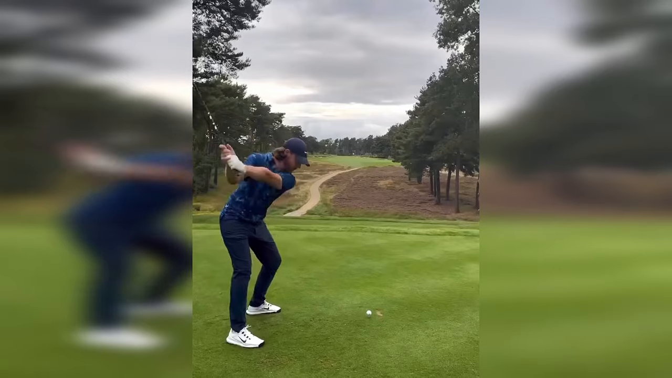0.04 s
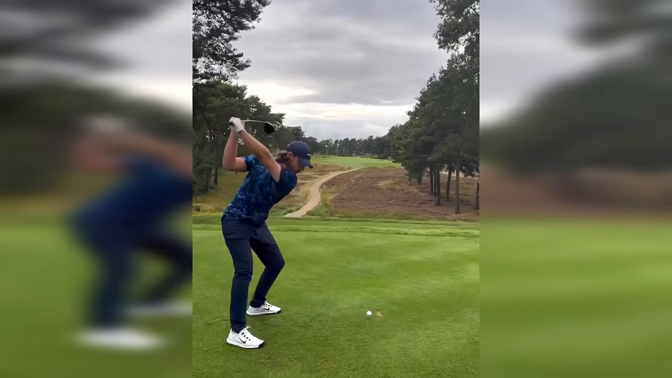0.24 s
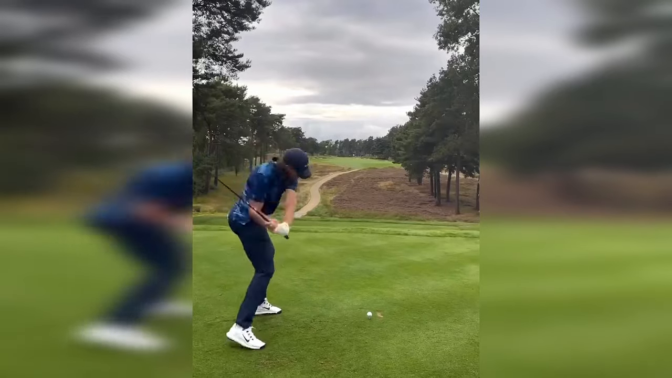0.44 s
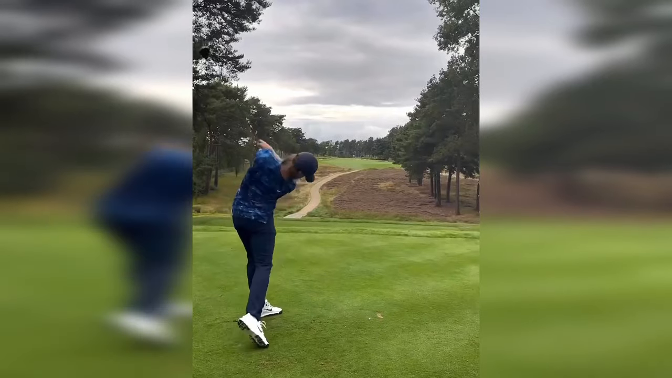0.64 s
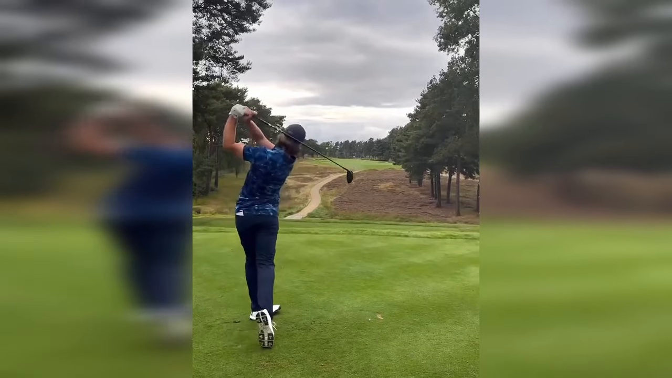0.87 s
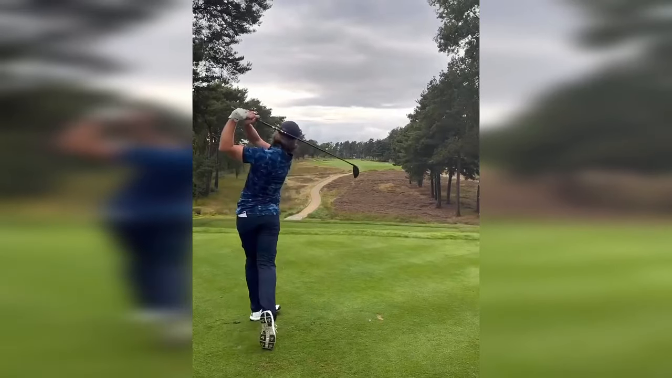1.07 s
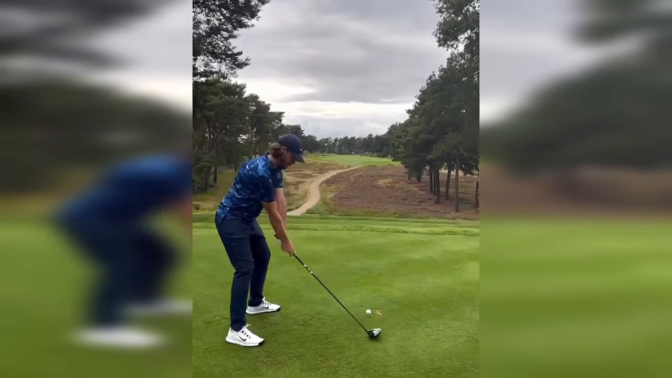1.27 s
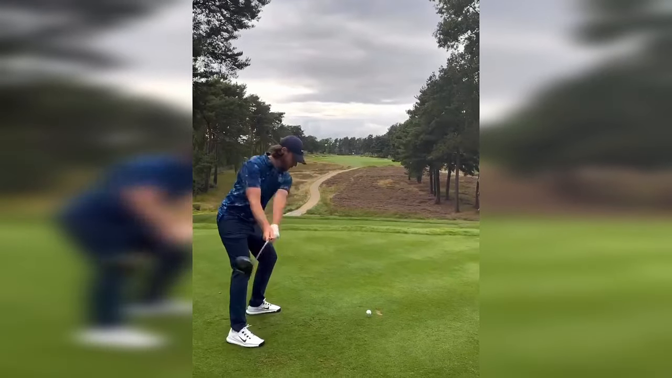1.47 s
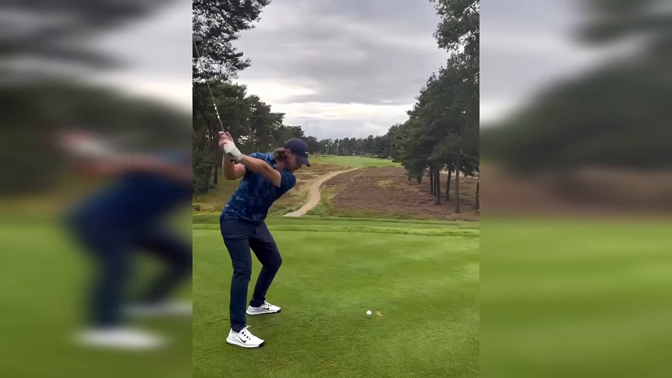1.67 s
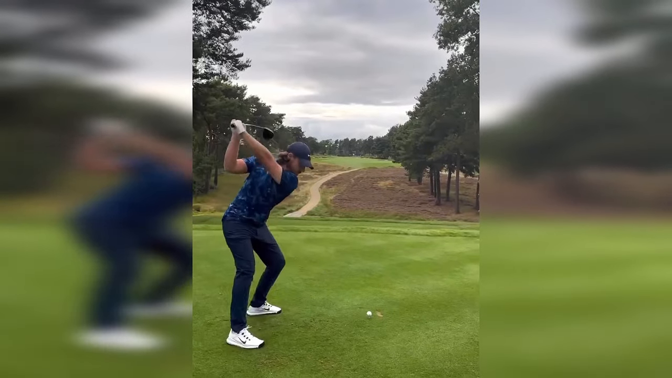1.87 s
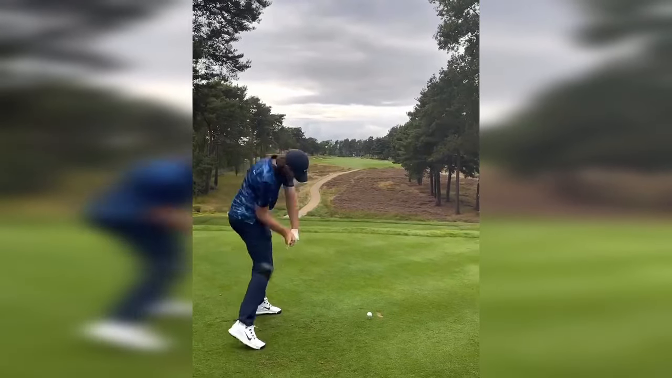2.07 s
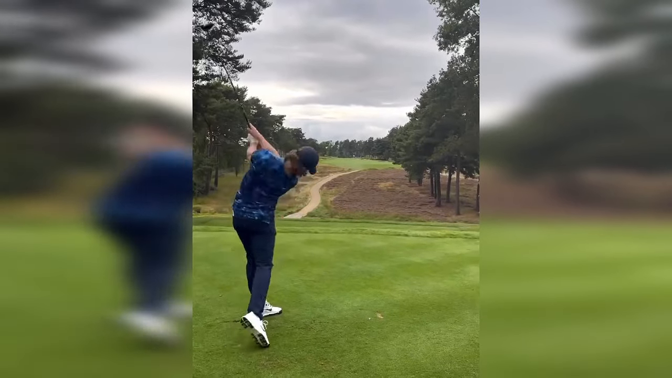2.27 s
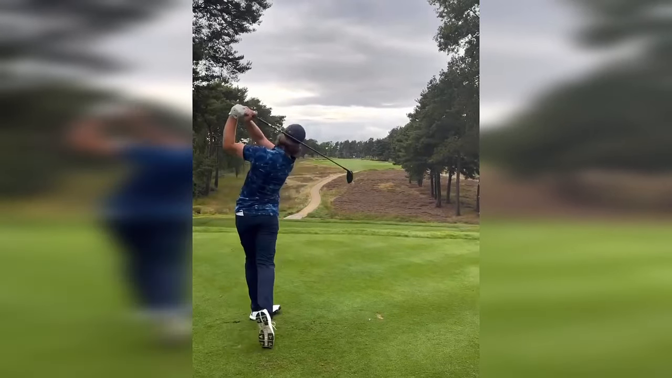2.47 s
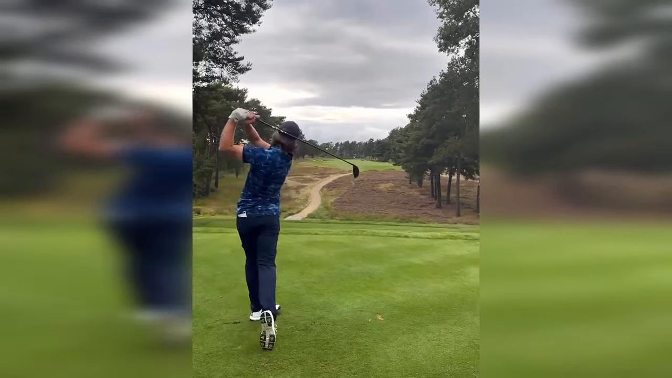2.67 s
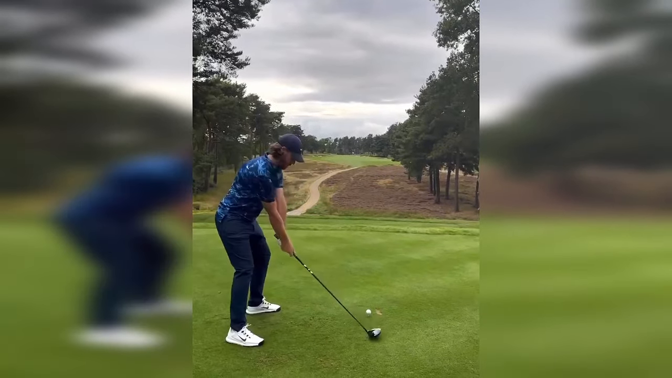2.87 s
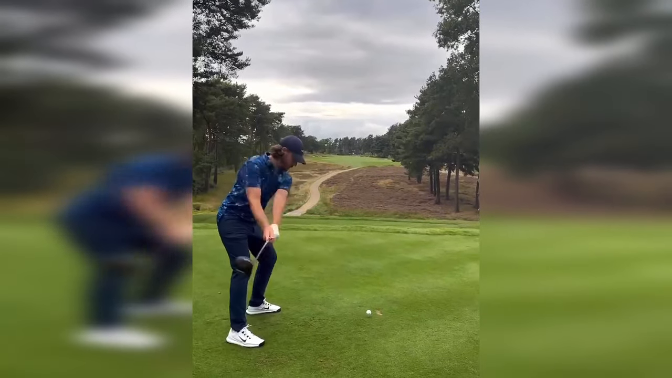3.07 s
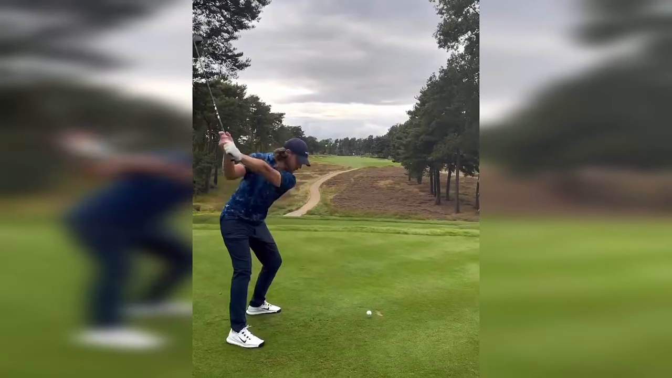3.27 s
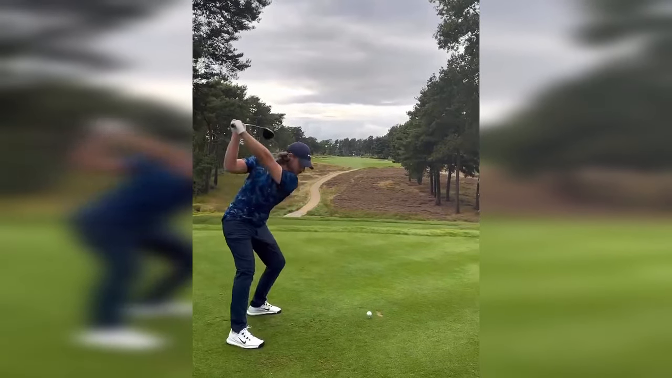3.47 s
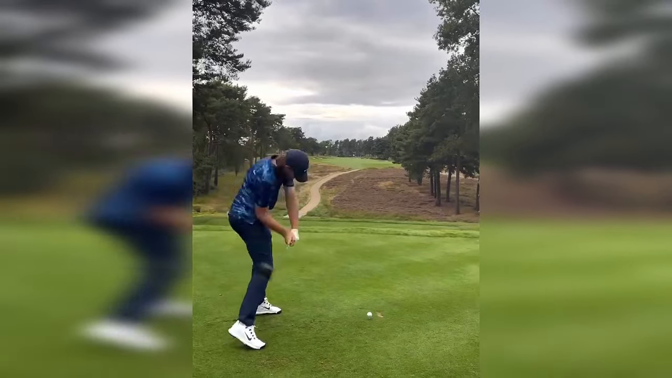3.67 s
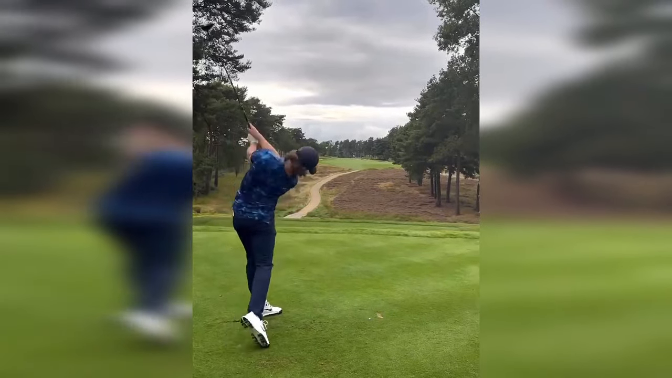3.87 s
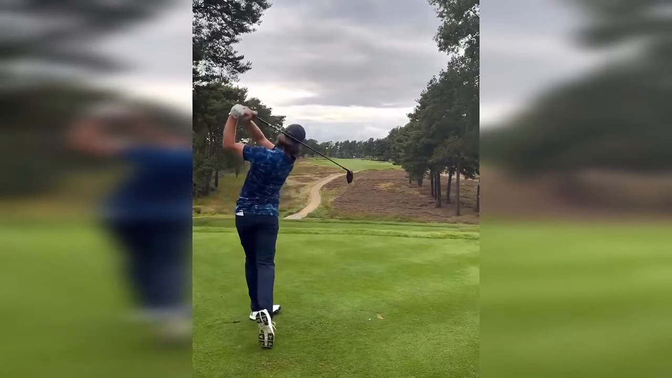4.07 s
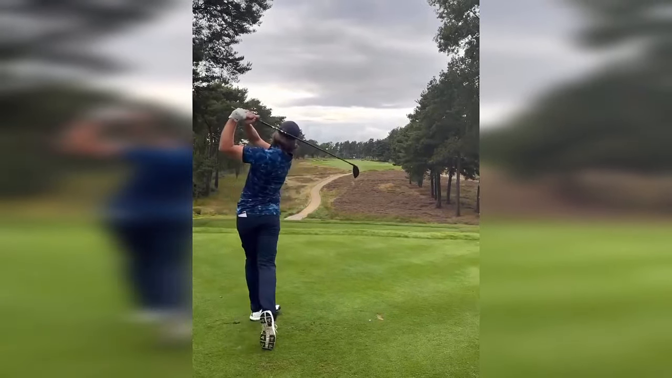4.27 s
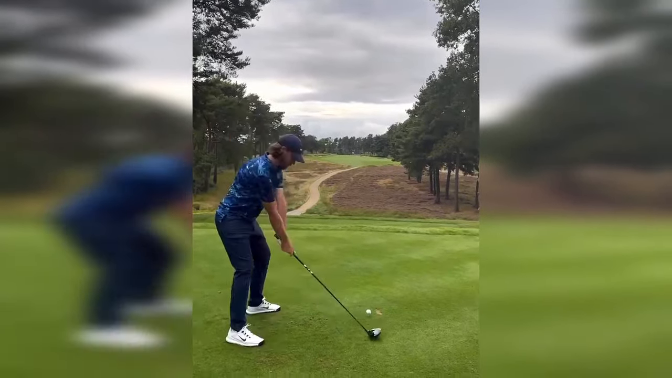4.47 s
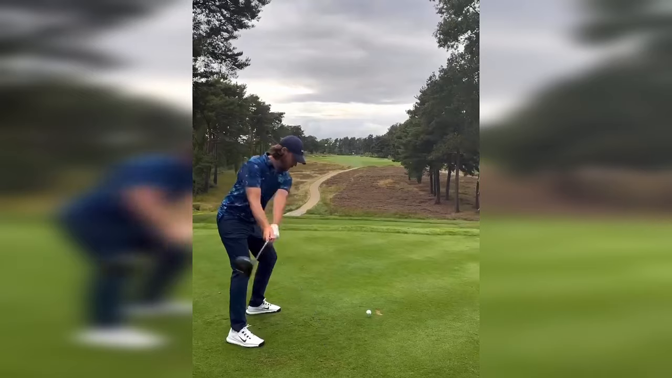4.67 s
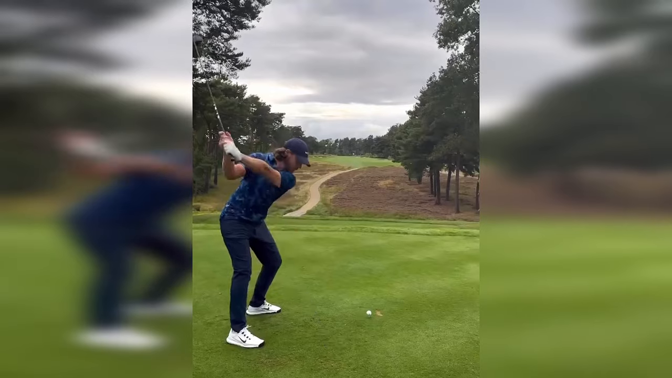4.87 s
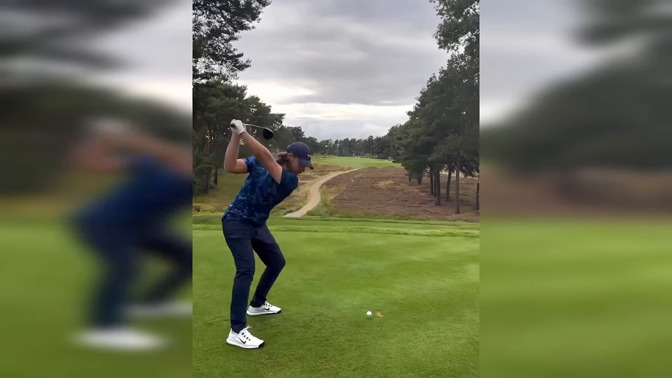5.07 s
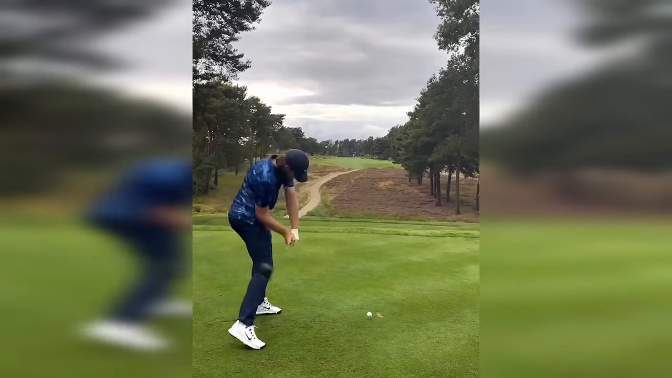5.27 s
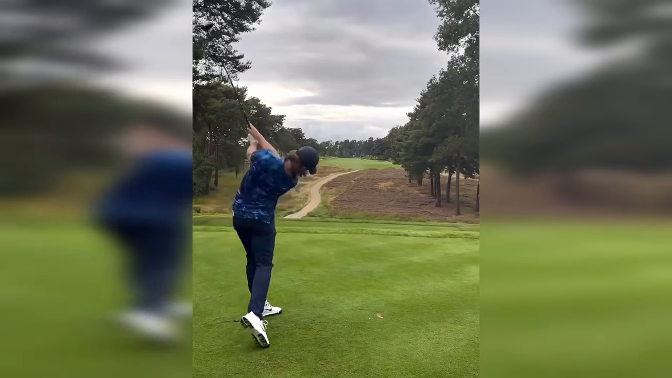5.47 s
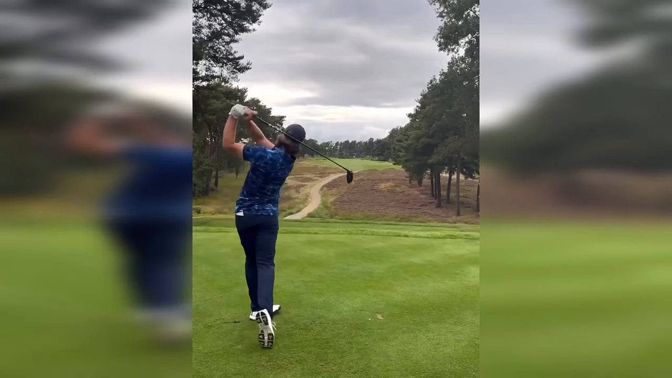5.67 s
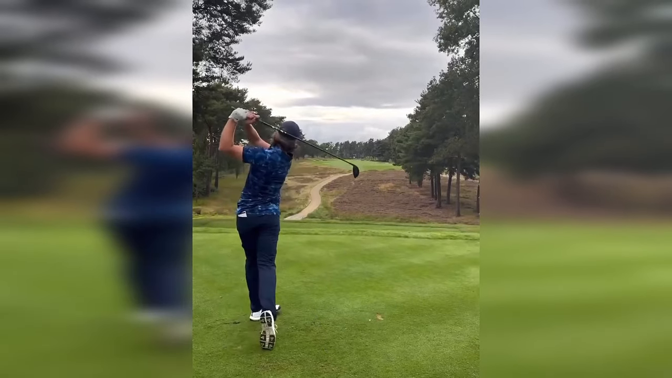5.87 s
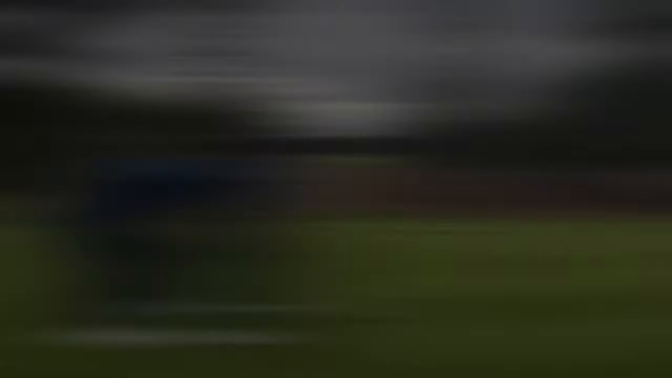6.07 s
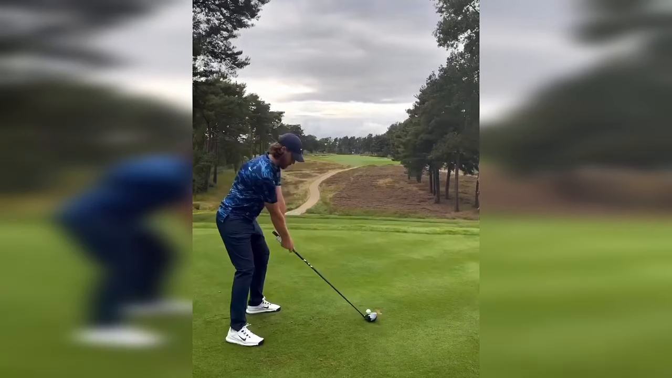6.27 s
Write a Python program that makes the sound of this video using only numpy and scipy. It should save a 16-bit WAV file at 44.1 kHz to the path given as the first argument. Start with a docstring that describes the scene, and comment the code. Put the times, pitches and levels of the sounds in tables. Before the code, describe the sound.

On an open tee between pine woods, distant machinery throbs low beneath a soft far roar. A club rushes through the air and hits the ball with a very loud, bright, dry metallic crack, followed by a brief scattered echo from the trees. The background dips after the blow, then recovers. The same drive repeats four times, 1.6 seconds apart, and cuts to silence. Close stereo microphone.

```python
"""Distant machinery rumbles, then a golf drive cracks off an open tee between pine woods, over and over.
The bass and roar are coloured noise with wavering tones; the swish is a sliding vortex tone in torn air.
The crack is a sum of ringing club head modes, and tee, turf and tree lines return it as decaying noise.
Two spaced microphone ports hear it all; gain control ducks the sound after the blow.
The stretch around the single drive repeats as a short loop until it stops."""
import sys
import numpy as np
from scipy import signal
from scipy.fft import rfft, irfft, next_fast_len
from scipy.io import wavfile

SR = 44100
rng = np.random.default_rng(int(sys.argv[2]) if len(sys.argv) > 2 else 0)


def master_out(mix):
    """Clip the mix to full scale and print it as 16-bit PCM to the path in sys.argv[1]."""
    frames = np.transpose(np.atleast_2d(mix))
    ceiling = np.clip(frames, -1, 1)
    pcm = np.round(ceiling * 32767).astype(np.int16)
    wavfile.write(sys.argv[1], SR, pcm)


N = 279064
TIME = np.arange(N) / SR   # [s]
STRIKE_S = 3.70810   # the blow, on the clock of the single drive


def crack():
    """The brief squash of the ball rings the hollow head; each path to the ports repeats the ring."""
    # ringing modes of the club head: (frequency [Hz], left level [dB], right level [dB], 60 dB decay [s])
    head_modes = [(330, -22, -24, .012), (575, -20, -21, .010), (990, -6, -14, 0.009),
                  (1870, -7, -10, 0.009), (2400, -15, -16, .008), (3600, -25, -24, .010),
                  (4150, -23, -21, 0.008), (4860, -18, -12, 0.013), (5350, -14, -8, 0.005),
                  (5760, -6, -3, 0.015), (6270, -20, -18, 0.012), (6830, -17, -17, .014),
                  (7700, -16, -18, 0.011), (8590, -16, -19, 0.009), (10500, -13, -13, 0.002),
                  (13050, -4, -5, 0.0035), (14500, -9, -10, 0.003)]
    # direct, off the turf, then off the player and bag: (left delay [s], right delay [s], level [dB])
    paths = [(.0003, .0001, 0), (.00100, .00112, -9.5), (.0021, .0021, -16), (.0037, .0031, -15),
             (.0072, .0072, -22)]
    contact_s = .0007
    # the low modes come from the left: the right port hears them late
    thud_below_hz, thud_lag_s = 3000, .00016
    t = np.arange(int(.08 * SR)) / SR
    out = np.zeros((2, N))
    for side in range(2):
        for path in paths:
            for mode in head_modes:
                hz, level_db, decay_s = mode[0], mode[1 + side] + path[2], mode[3]
                delay_s = path[0] + side * thud_lag_s if hz < thud_below_hz else path[side]
                since = np.maximum(t - delay_s, 0)
                swell = 1 - np.exp(-(since / contact_s) ** 2)   # force builds while the ball flattens
                # the cosines of all modes crest together as the ball lets go
                ring = np.cos(2 * np.pi * hz * (since - contact_s)) * amp(-60 * since / decay_s)
                out[side, :len(t)] += amp(level_db) * swell * ring
    return np.roll(out, round(STRIKE_S * SR), axis=1)


def swish():
    """The shaft sheds vortices: a rough sliding tone in a rush and hiss of torn air."""
    # downswing: (time [s], low rush level [dB], hiss level [dB])
    swing_levels = [(3.56, -67, -81), (3.6, -50.5, -66.5), (3.615, -42.5, -59.5), (3.64, -54, -58),
                    (3.658, -38.5, -45.5), (3.664, -34.5, -46), (3.69, -30.5, -43.5), (3.706, -32.5, -31),
                    (3.716, -42, -54), (3.74, -51, -65.5), (3.76, -69, -75.5), (3.8, -87, -92)]
    # colour of the low rush: (frequency [Hz], relative level per Hz [dB])
    rush_colour = [(90, -26.5), (170, -3.5), (300, 0.5), (450, -1), (600, 7), (800, 0), (1100, 6),
                   (1500, -2.5), (2000, -8.5), (2700, -11.5), (3500, -17), (4500, -26.5)]
    # colour of the hiss: (frequency [Hz], relative level per Hz [dB])
    hiss_colour = [(1500, -10), (3000, -8.5), (4500, -1.5), (6000, 4), (8000, -2.5), (11000, -11.5),
                   (15100, -11), (15600, -34.5)]
    # the tone holds until shortly before the blow and slides down meanwhile
    hold_from_s, hold_until_s, hold_db = 3.666, 3.690, -29
    rise_db_per_s, fall_db_per_s = 2500, 900
    start_hz, sag_hz_per_s = 864.6, 8900
    rush_db, hiss_db = in_time(swing_levels)

    tone_db = hold_db + peaked(TIME, hold_from_s, hold_until_s, rise_db_per_s, fall_db_per_s)
    tone_hz = start_hz - sag_hz_per_s * (np.clip(TIME, hold_from_s, hold_until_s) - hold_from_s)
    turn = 2 * np.pi * np.cumsum(tone_hz) / SR
    # slow noise roughens both the strength and the phase
    slow = signal.butter(2, 90.0, fs=SR, output="sos")
    wobble = signal.sosfilt(slow, rng.standard_normal((2, N)))
    in_phase = (2.1 + rms_one(wobble[0])) * np.cos(turn)
    tone = rms_one(in_phase + rms_one(wobble[1]) * np.sin(turn))

    rush, hiss = noise(rush_colour, channels=3), noise(hiss_colour)
    aimed_tone = ports(amp(tone_db) * tone, lag=16, pan_db=7)
    aimed_rush = ports(amp(rush_db) * rush[0], lag=22, pan_db=4.5)
    rush_around = amp(rush_db - 3) * rush[1:]   # the rush also comes from all around
    wide_hiss = amp(hiss_db) * hiss * amp([[-.7], [.7]])   # a little stronger on the right
    return aimed_tone + aimed_rush + rush_around + wide_hiss


def scattered_returns():
    """Tee, turf and countless trunks scatter the crack back as a dense wash that dulls with distance."""
    # tee and turf: (time after the blow [s], level [dB], rise [dB/s], fall [dB/s])
    near_scatterers = [(0.004, -27, 3000, 1200), (.013, -39, 1500, 1200), (.023, -40, 1500, 500),
                       (.034, -42, 400, 3000)]
    # tree lines, then far woods: (time after the blow [s], level [dB], rise [dB/s], fall [dB/s])
    far_scatterers = [(0.117, -43, 195, 156), (.2, -58, 60, 27)]
    # close returns keep the head's ring: (frequency [Hz], relative level per Hz [dB])
    near_colour = [(400, -10.5), (1000, -10), (1500, -16), (2700, -16), (3150, -24), (4000, -14),
                   (5000, -2.5), (5500, -8), (6000, -4), (7200, -8), (8400, -4), (10100, -11.5),
                   (11600, -15), (15000, -12), (15700, -40.5)]
    # colour of the woods' returns: (frequency [Hz], relative level per Hz [dB])
    far_colour = [(500, -23), (1500, -10.5), (3000, -6.5), (4500, -10.5), (6000, -3), (7100, -3),
                  (7800, -6.5), (9000, -8.5), (12000, -11), (15000, -13.5), (16000, -37)]
    # longer paths lose their treble: (above this frequency [Hz], further loss [dB/s])
    air_loss = [(7300, 29.5), (10000, 34)]
    since, wash = TIME - STRIKE_S, 0
    for table, spectrum in ((near_scatterers, near_colour), (far_scatterers, far_colour)):
        power = 0
        for s, db, rise_db, fall_db in table:
            power = power + amp(db + peaked(since, s, s, rise_db, fall_db)) ** 2
        wash = wash + np.sqrt(power) * far_off(spectrum)
    for split_hz, loss_db in air_loss:
        treble_gain = amp(-loss_db * np.maximum(since, 0))
        wash = wash + (treble_gain - 1) * above(split_hz, wash)
    clumps = rms_one(resonance(rng.standard_normal((2, N)), 46, 90))   # trunks stand unevenly
    return (since > 0) * amp(2.0 * clumps) * wash


def rustles():
    """Short faint puffs of band noise, heard at address."""
    # bright puffs: (start [s], length [s], low edge [Hz], high edge [Hz], level [dB])
    puffs = [(2.747, 0.064, 10200, 15600, -81), (2.769, 0.0094, 3000, 15000, -70),
             (2.782, 0.13, 7650, 8600, -75)]
    out = np.zeros((2, N))
    for s, length, low_hz, high_hz, db in puffs:
        shape = np.sin(np.pi * np.clip((TIME - s) / length, 0, 1)) ** 0.86
        band = signal.butter(2, [low_hz, high_hz], "band", fs=SR, output="sos")
        puff = rms_one(signal.sosfilt(band, rng.standard_normal((2, N))))
        out += amp(db) * shape * puff
    return out


def rumble():
    """Distant machinery: throbbing bass noise with wavering drones, and a far broadband roar."""
    # level course, with the further ducking after the blow:
    # (time [s], bass gain [dB], far roar gain [dB])
    rumble_levels = [(2.69, -4.5, -2), (2.72, -6, -2), (2.76, -6, 1), (2.9, -3, 1), (3.0, -3, 0.5),
                     (3.27, -2.5, 1.5), (3.55, -1.5, 2.1), (3.65, -2.5, 4), (3.70, -1, 0),
                     (3.716, -11, 0.5), (3.745, -9, -6.5), (3.79, -12, -8.5), (3.84, -11, -6),
                     (4.0, -12, -7), (4.29, -8.5, -1.5)]
    # the bass swells briefly: (time [s], rise [dB])
    swells = [(2.807, 6), (2.876, 5), (3.007, 0.5), (3.434, 4.5), (3.56, 1.5)]
    # bass colour: (frequency [Hz], relative level per Hz [dB]); bass level before its level course [dB]
    bass_colour, bass_db = [(12, -51), (20, -28.5), (60, 2), (114, -4.5), (132, -6), (166, -17),
                            (203, -5.5), (325, -20), (392, -22.5), (500, -22.5), (650, -42.5), (1100, -120)], -38
    # bass drones: (frequency [Hz], width [Hz], level before the level course [dB])
    drones = [(72, 100, -49), (71, 5.2, -42), (121, 17, -42), (199.9, 4.8, -49.5), (396.6, 3.8, -60)]
    # colour of the far roar: (frequency [Hz], relative level per Hz [dB])
    roar_colour = [(150, -41), (300, -2.5), (550, -4.5), (1000, -2), (1300, -6.5), (1600, -10), (2400, -10),
                   (3200, -8.5), (3900, -16), (4600, -27), (6200, -26.5), (7000, -34.5), (7500, -41.5),
                   (8600, -43.5), (9600, -67), (12000, -66.5), (15300, -71)]
    # faint narrow tones in the roar: (frequency [Hz], width [Hz], level against the roar noise [dB])
    whines = [(980, 6, -12), (1250, 6, -18)]
    swell_s, roar_db = 0.016, -49.5   # the roar level is before its level course
    bass_course_db, roar_course_db = in_time(rumble_levels)
    for s, rise_db in swells:
        bass_course_db = bass_course_db + rise_db * np.exp(-((TIME - s) / swell_s) ** 2)
    bass = amp(bass_db) * noise(bass_colour, channels=1)[0] + wavering(drones)
    roar = far_off(roar_colour, wavering(whines))
    return amp(bass_course_db) * ports(bass, lag=4, pan_db=0.89) + amp(roar_db + roar_course_db) * roar


def far_off(spectrum, tones=0):
    """Distant noise: part arrives from one side, part from all around."""
    # spread of distant sound: (frequency [Hz], level from all around against the one-sided part [dB])
    spread = [(150, -22.5), (300, -14.5), (600, 10), (1200, 1), (1800, -5), (2200, -20.5), (3000, -18.5),
              (3300, -9), (3800, -1.5), (4800, 3.5), (15300, 6.5)]
    size = next_fast_len(N)
    wash = noise(spectrum, channels=3)
    ratio = colour(spread) ** 2   # power from all around over one-sided power
    aimed = irfft(rfft(wash[0], size) / np.sqrt(1 + ratio), size)[:N]
    around = irfft(rfft(wash[1:], size) * np.sqrt(ratio / (1 + ratio)), size)[:, :N]
    return ports(aimed + tones, lag=8, pan_db=0.57) + around


def ports(mono, lag, pan_db):
    """One source at both ports: the right hears it lag samples late, the left pan_db stronger."""
    late = np.interp(np.arange(N) - lag, np.arange(N), mono)
    return np.array([mono * amp(pan_db / 2), late * amp(-pan_db / 2)])


def wavering(tones):
    """Noise twice through each narrow peak makes a tone that wavers in strength."""
    out = 0
    for hz, width_hz, db in tones:
        once = resonance(rng.standard_normal(N), hz, width_hz)
        out = out + amp(db) * rms_one(resonance(once, hz, width_hz))
    return out


def resonance(x, hz, width_hz):
    """Two-pole peak: a damped oscillator driven by x."""
    r = np.exp(-np.pi * width_hz / SR)
    return signal.lfilter([1, 0, -1], [1, -2 * r * np.cos(2 * np.pi * hz / SR), r * r], x)


def noise(spectrum, channels=2):
    """Unrelated noises with the given colour, at rms 1 over all channels."""
    size = next_fast_len(N)
    white = rng.standard_normal((channels, size))
    return rms_one(irfft(rfft(white) * colour(spectrum), size)[:, :N])


def colour(spectrum):
    """Gain per frequency bin, in dB along log frequency, -120 dB beyond the ends."""
    size = next_fast_len(N)
    hz, db = np.transpose(spectrum)
    bins = np.log(np.maximum(np.arange(size // 2 + 1) * SR / size, 1))
    return amp(np.interp(bins, np.log(hz), db, left=-120, right=-120))


def above(hz, x):
    """The part of x above hz, without phase shift."""
    return signal.sosfiltfilt(signal.butter(2, hz, "high", fs=SR, output="sos"), x)


def peaked(t, first, last, rise_db, fall_db):
    """Envelope in dB: climbs to 0 at first, holds to last, then falls (slopes in dB/s)."""
    return -rise_db * np.maximum(first - t, 0) - fall_db * np.maximum(t - last, 0)


def in_time(rows):
    """Columns of a curve table, sample by sample."""
    s, *columns = np.transpose(rows)
    return [np.interp(TIME, s, c) for c in columns]


def amp(db):
    """Gain from dB."""
    return 10 ** (np.asarray(db) / 20)


def rms_one(x):
    """Scale to unit rms."""
    return x / np.sqrt(np.mean(x ** 2) + 1e-20)


def scene():
    """All sources of the single drive at the two ports."""
    return crack() + swish() + scattered_returns() + rustles() + rumble()


def gain_control(x):
    """Gain falls with the excess over the threshold and creeps back, less so in the upper band."""
    threshold_db, duck_share = -3, 0.26   # dB of ducking per dB of excess
    attack_s, release_db_per_s = .008, 3   # the release is that of the held level
    treble_from_hz, treble_duck_share = 1800, .45   # the upper band takes this part of the dB
    level_db = 20 * np.log10(np.abs(x).max(axis=0) + 1e-9)
    release_db = release_db_per_s * TIME
    held_db = np.maximum.accumulate(level_db + release_db) - release_db
    r = np.exp(-1 / (attack_s * SR))
    excess_db = np.maximum(held_db - threshold_db, 0)
    duck_db = signal.lfilter([1 - r], [1, -r], duck_share * excess_db)
    treble = above(treble_from_hz, x)
    return (x - treble) * amp(-duck_db) + treble * amp(-treble_duck_share * duck_db)


def looped(x):
    """The stretch around the drive is laid end to end with short cross-fades, then stops."""
    # the plays in turn: shift of each against the single drive [samples]
    repeat_shifts = [-141160, -70560, 0, 70560, 141120]
    loop_start_s, loop_end_s, stop_s, stop_fade_s = 2.69, 4.29, 5.976, 0.025
    splice = 1100   # cross-fade where two plays meet [samples]
    first, last = round(loop_start_s * SR), round(loop_end_s * SR)
    out = np.zeros_like(x)
    for shift in repeat_shifts:
        at = np.arange(max(first + shift - splice, 0), min(last + shift + splice, N))
        fade_in = np.clip((at - shift - first) / splice + 1, 0, 1)
        out[:, at] = (1 - fade_in) * out[:, at] + fade_in * x[:, at - shift]
    return out * np.clip((stop_s - TIME) / stop_fade_s + .5, 0, 1)


def record(dry):
    """Gain control, the loop, limiting at full scale, and a steep top cut at 16.7 kHz."""
    top_cut = signal.cheby2(20, 70, 16700, fs=SR, output="sos")
    limited = np.clip(looped(gain_control(dry)), -1, 1)
    return signal.sosfilt(top_cut, limited)


dry = scene()
out = record(dry)
master_out(out)
```